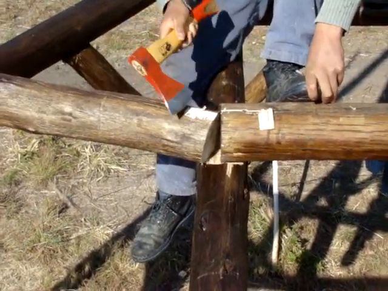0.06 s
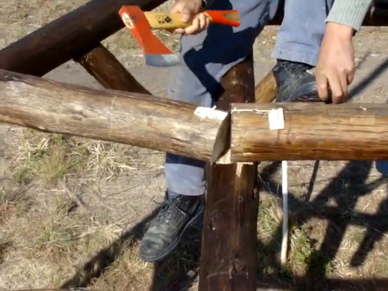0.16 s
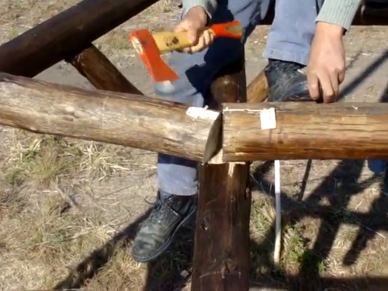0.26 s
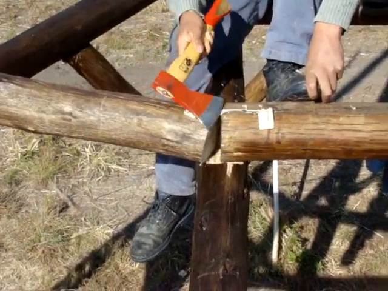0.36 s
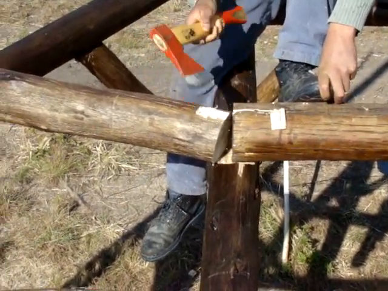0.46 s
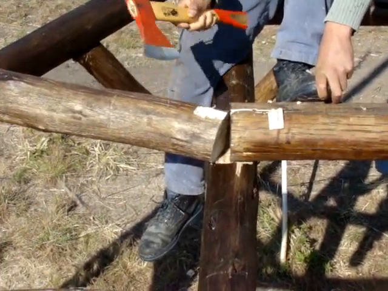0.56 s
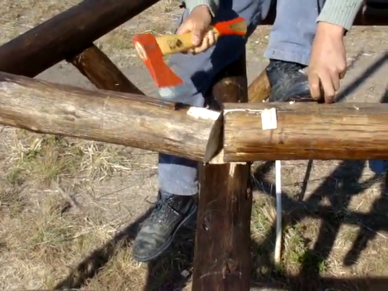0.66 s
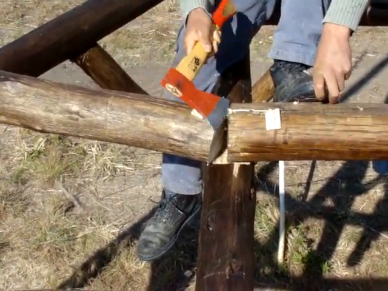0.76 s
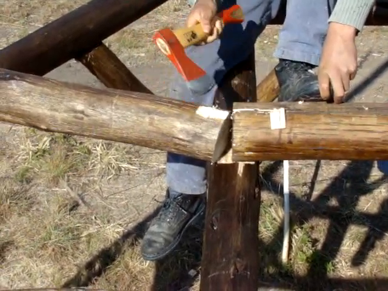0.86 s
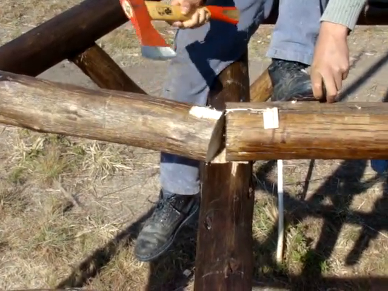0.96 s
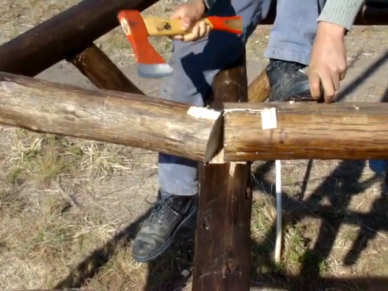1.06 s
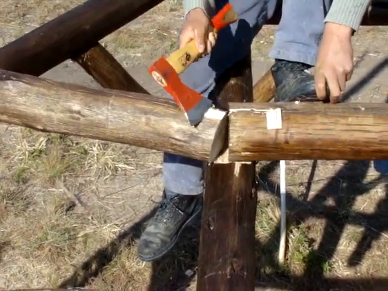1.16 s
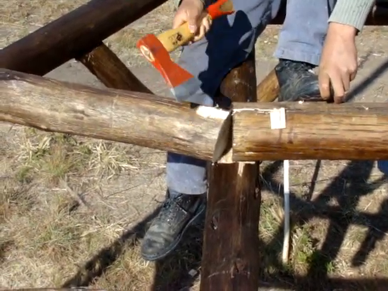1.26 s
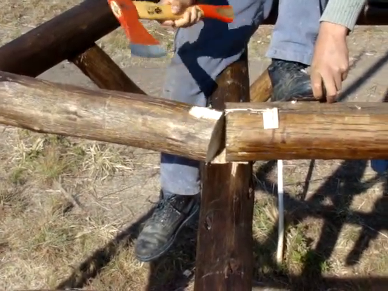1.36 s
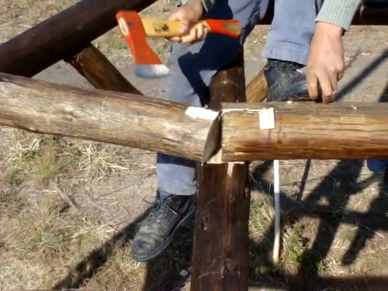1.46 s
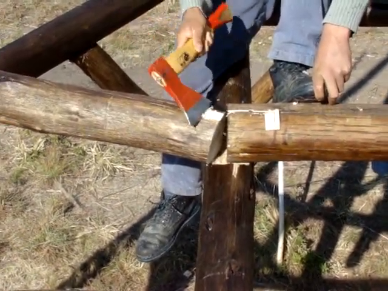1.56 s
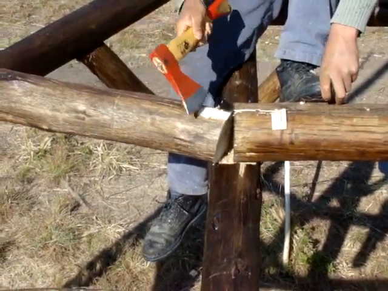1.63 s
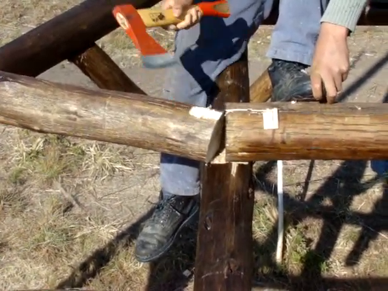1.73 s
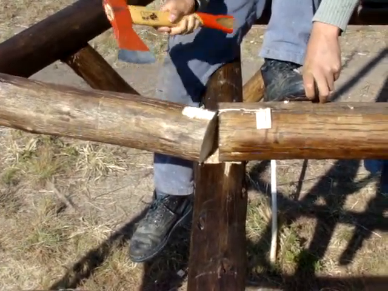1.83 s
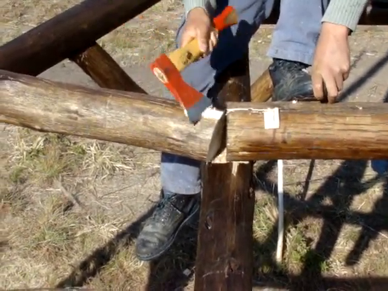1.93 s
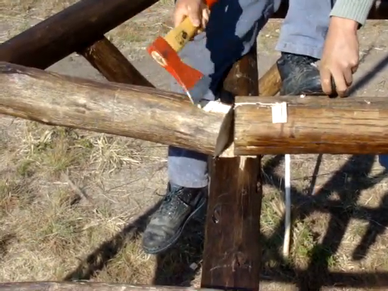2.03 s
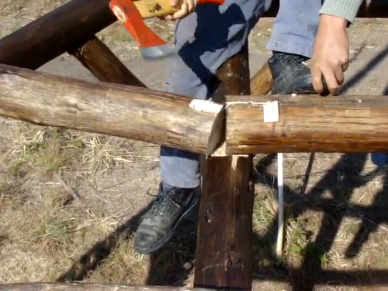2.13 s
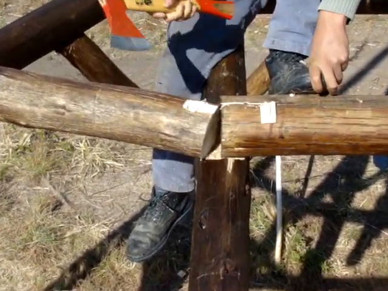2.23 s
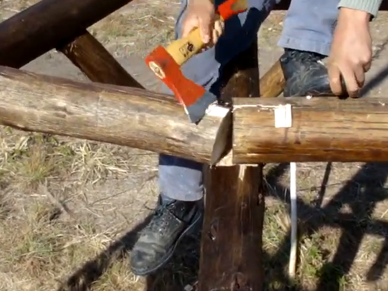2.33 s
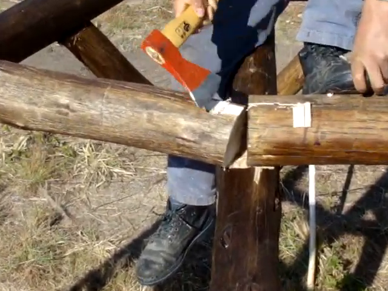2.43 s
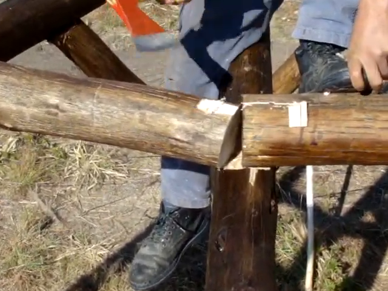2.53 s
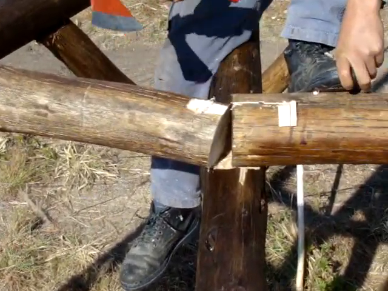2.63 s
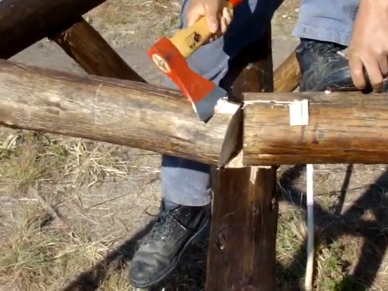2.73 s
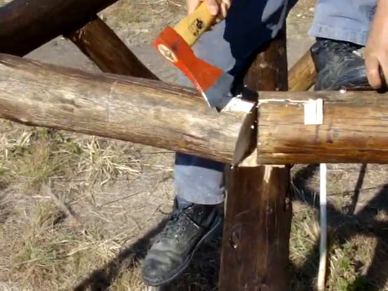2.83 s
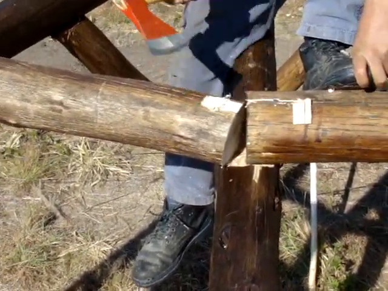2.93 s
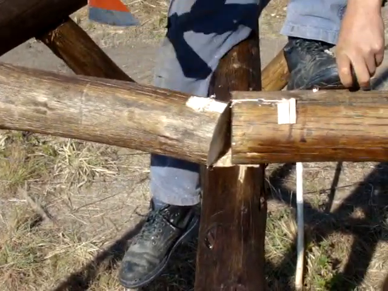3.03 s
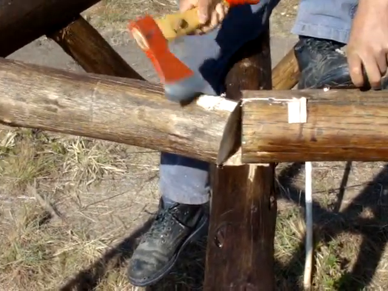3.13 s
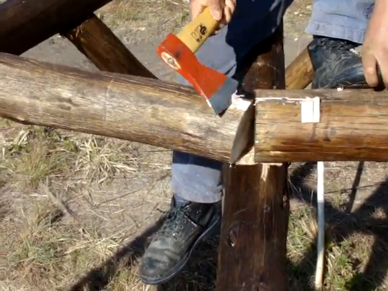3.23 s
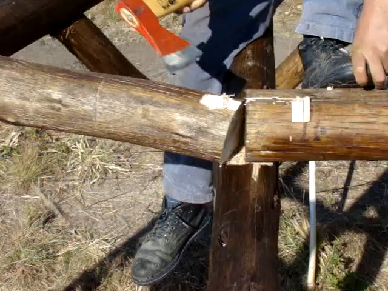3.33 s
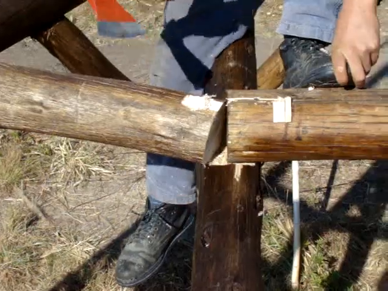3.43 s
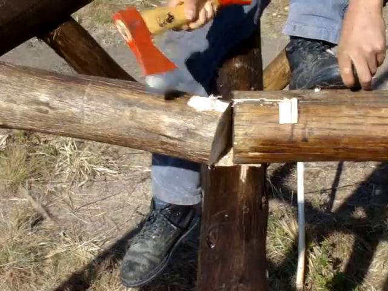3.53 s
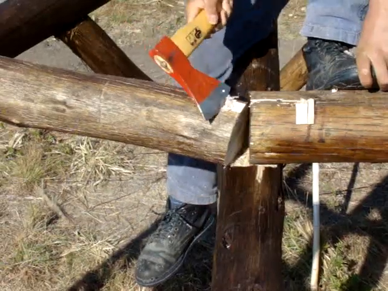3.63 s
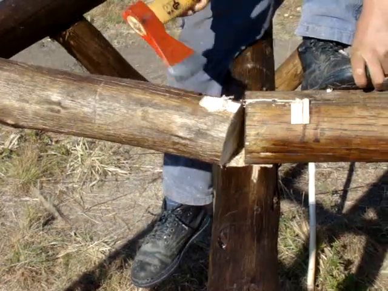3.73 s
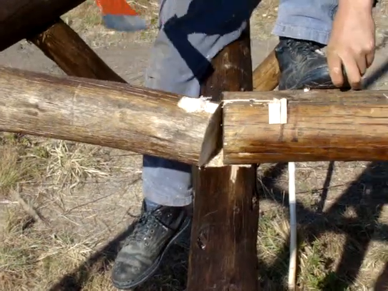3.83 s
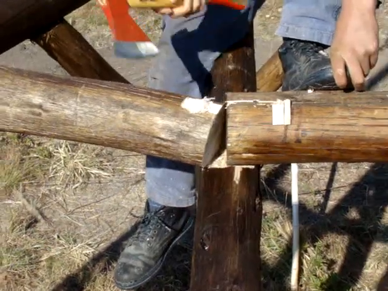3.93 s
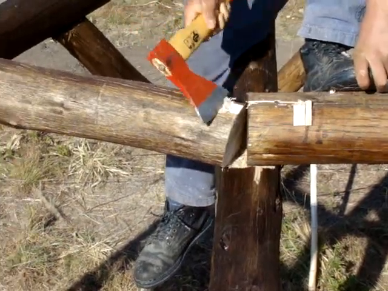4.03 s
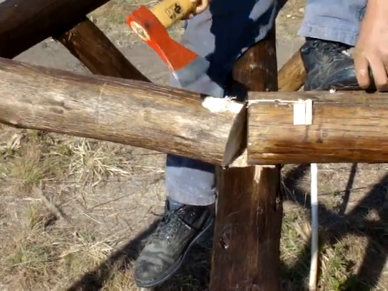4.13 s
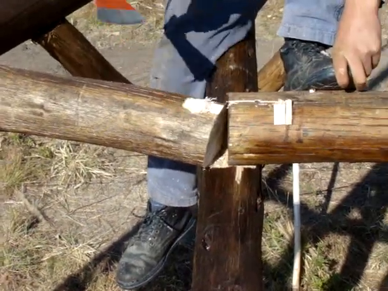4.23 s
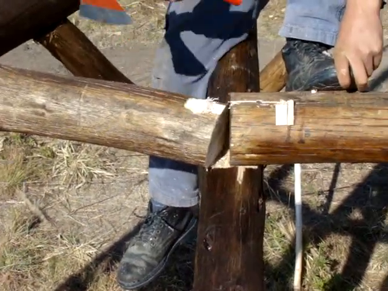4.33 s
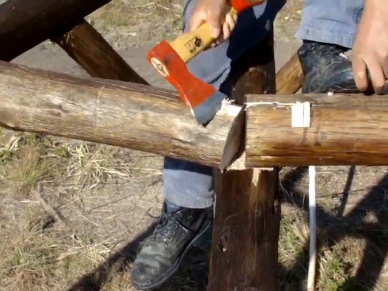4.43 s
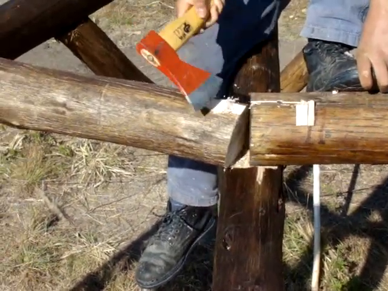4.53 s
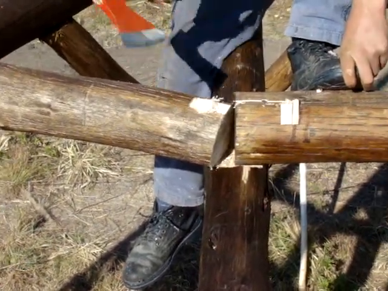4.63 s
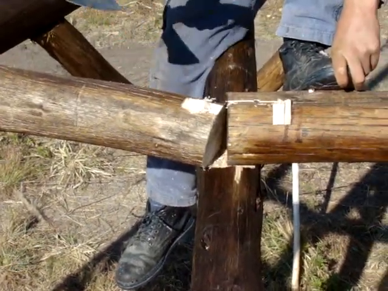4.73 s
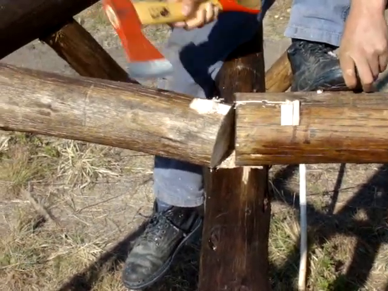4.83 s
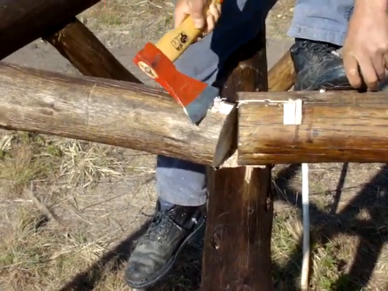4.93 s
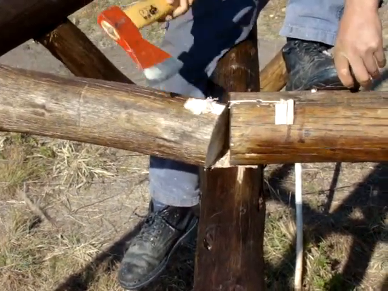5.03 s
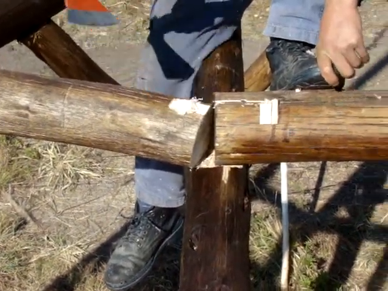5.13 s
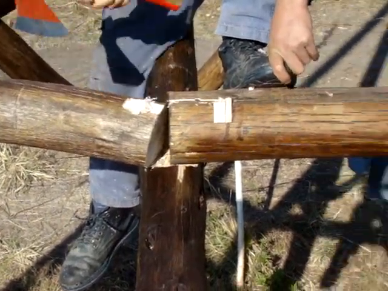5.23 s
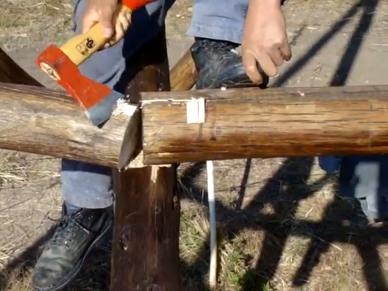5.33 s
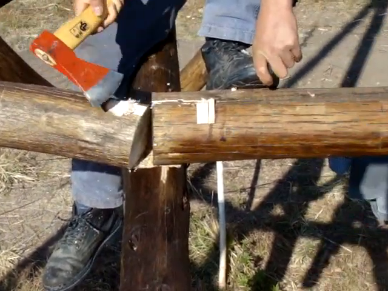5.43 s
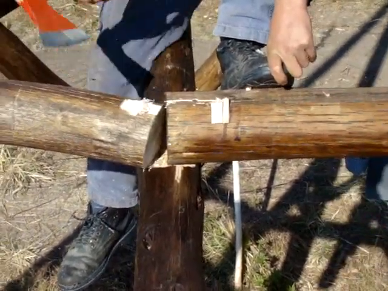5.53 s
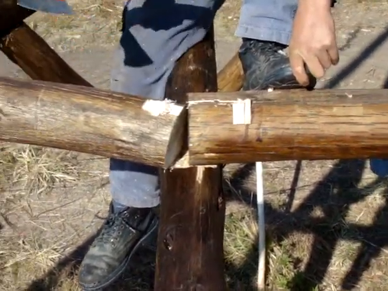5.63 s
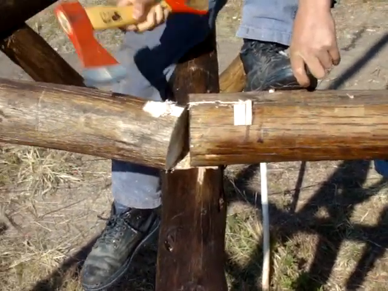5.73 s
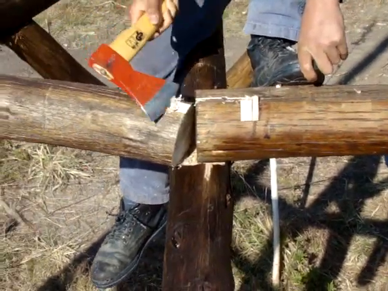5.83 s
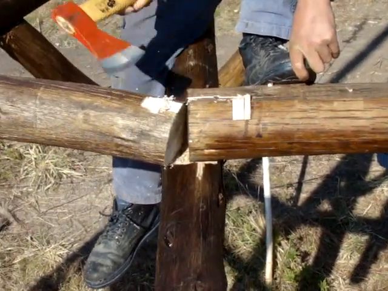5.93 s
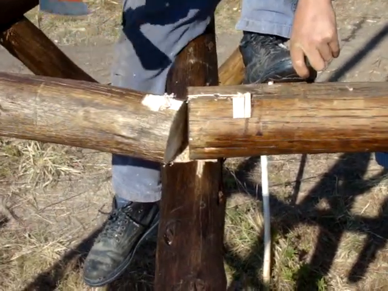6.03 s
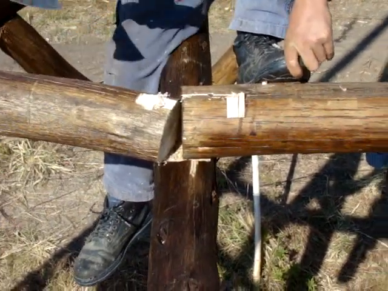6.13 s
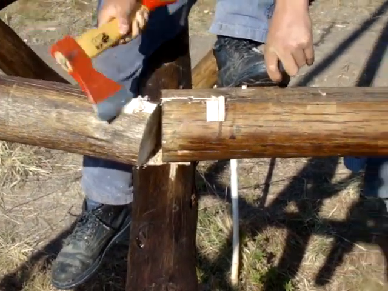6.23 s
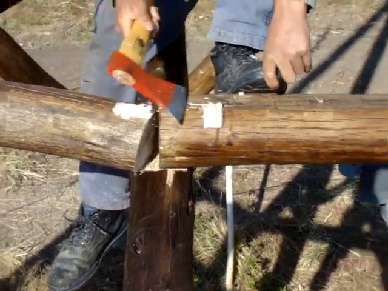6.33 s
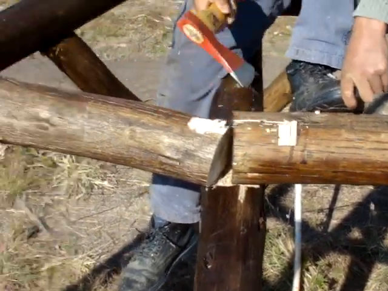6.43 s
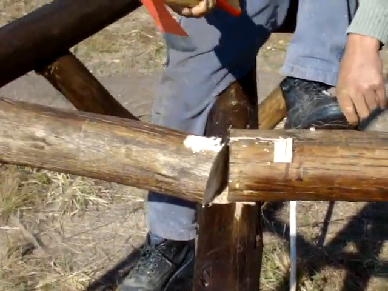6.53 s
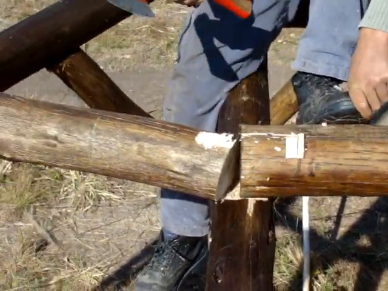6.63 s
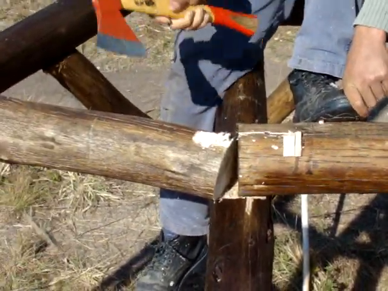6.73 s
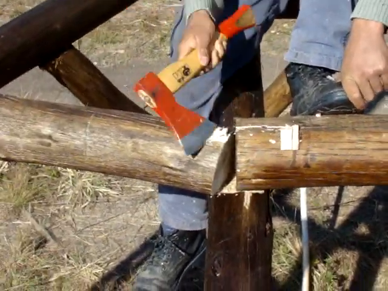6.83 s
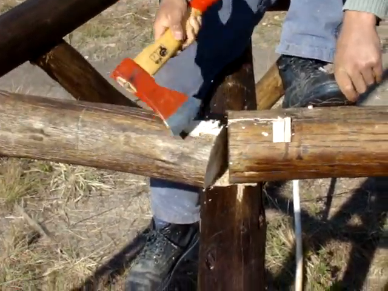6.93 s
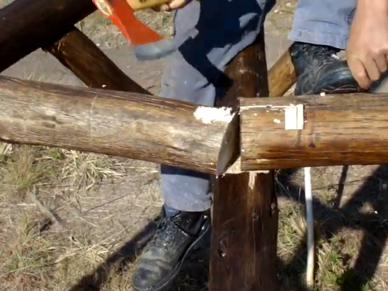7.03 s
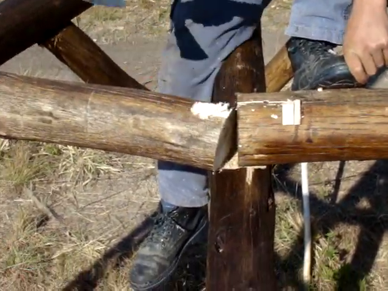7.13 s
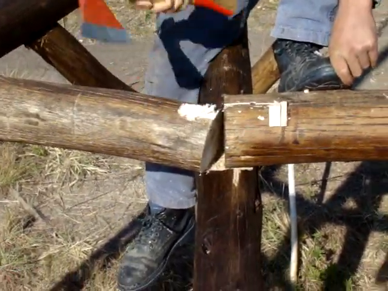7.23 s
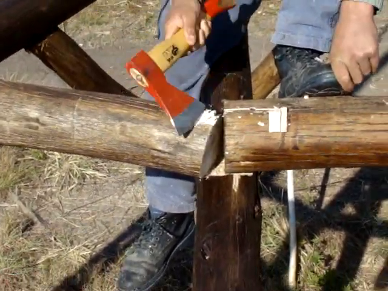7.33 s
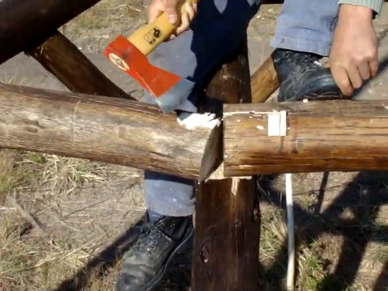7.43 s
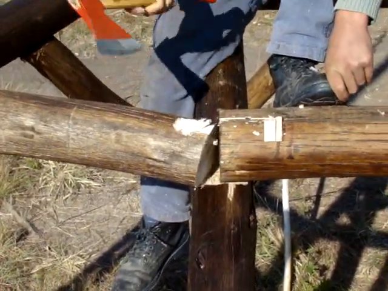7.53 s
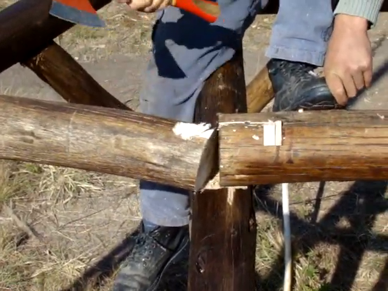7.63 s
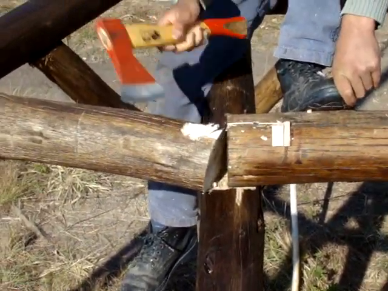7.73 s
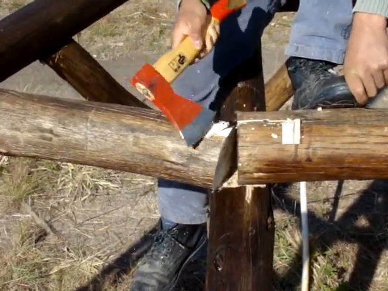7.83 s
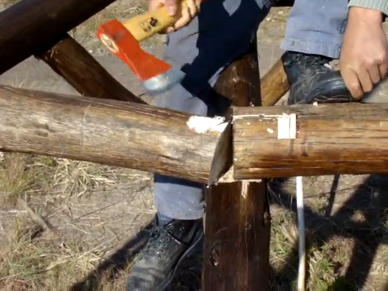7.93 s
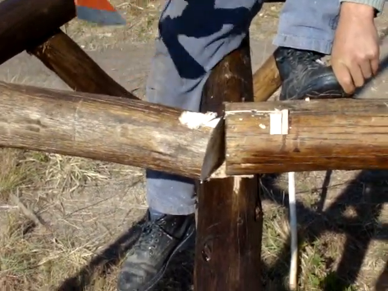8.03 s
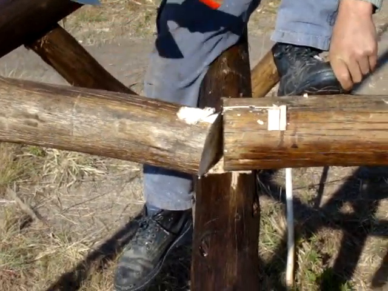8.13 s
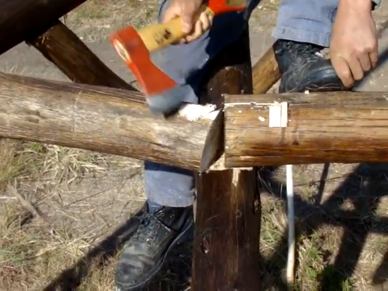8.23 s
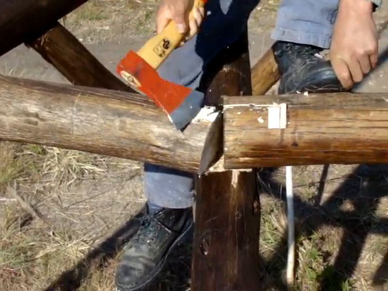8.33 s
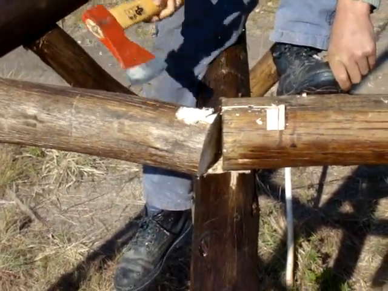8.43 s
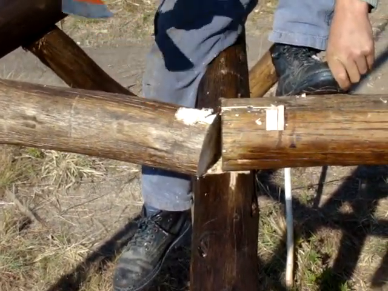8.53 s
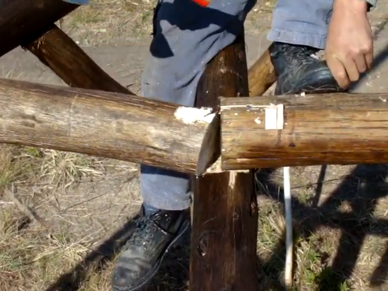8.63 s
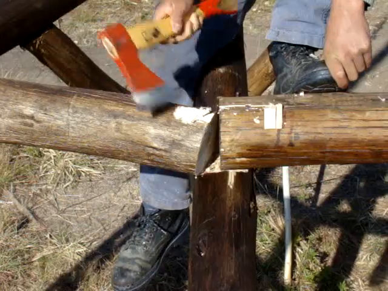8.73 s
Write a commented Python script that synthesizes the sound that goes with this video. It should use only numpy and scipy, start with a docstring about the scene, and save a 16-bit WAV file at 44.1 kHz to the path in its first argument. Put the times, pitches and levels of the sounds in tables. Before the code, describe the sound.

Quick, regular hatchet blows crack into a dry log, close up, over low wind gusts, plasticky handling ticks and faint distant sparrow chirps.

```python
"""A hatchet trims the end of a round pole in a log frame outdoors, some twenty light blows.
Struck wood and the steel head ring as sums of decaying modes; crack, splinters and thud are shaped noise.
Fingers tick and rustle on the plastic case of a small microphone by noise exciting its modes.
Gusts are lumpy low noise with short falling swings; sparrows chirp far off as gliding sines.
A faint squeak is three harmonics; still air is a bed of coloured noise."""
import sys
import numpy as np
from scipy import signal
from scipy.fft import rfft, irfft
from scipy.io import wavfile
from scipy.ndimage import uniform_filter1d

SR = 44100
rng = np.random.default_rng(int(sys.argv[2]) if len(sys.argv) > 2 else 0)


def digitize_waveform(pressure):
    """Quantize a signal to 16-bit integers and store it at the path in sys.argv[1].

    Rows of a 2-D input are taken as channels; values are limited to [-1, 1].
    """
    field = np.atleast_2d(pressure).T
    bounded = np.clip(field, -1, 1)
    quanta = np.round(bounded * 32767).astype(np.int16)
    wavfile.write(sys.argv[1], SR, quanta)


N = 386316  # length in samples


def amp(db):
    """Decibel law: the amplitude gain of a level in dB."""
    return 10 ** (np.asarray(db) / 20)


def evened(x):
    """Power normalisation: scales a signal to rms 1."""
    return x / np.sqrt(np.mean(x ** 2) + 1e-20)


def peaked(x):
    """Peak normalisation: scales a signal to a highest magnitude of 1."""
    return x / np.abs(x).max()


def read(points, hz):
    """Spectral interpolation: reads a table on a log-frequency axis."""
    f, value = np.transpose(points)
    return np.interp(np.log(hz + 1), np.log(f + 1), value)


def add(mix, s, sound):
    """Superposition: adds a sound to the mix at a time in seconds."""
    part = mix[round(s * SR):][:len(sound)]
    part += sound[:len(part)]


def coloured(x, points):
    """Linear filtering: weights the spectrum by a table of levels in dB."""
    gain = amp(read(points, np.fft.rfftfreq(len(x), 1 / SR)))
    return irfft(rfft(x) * gain, len(x))


def decaying(noise, t60_points):
    """Frequency-dependent damping: each band of the noise dies at its own rate."""
    hz, t, z = signal.stft(noise, SR, nperseg=256)
    t60 = read(t60_points, hz)[:, None]
    return signal.istft(z * amp(-60 * t / t60), SR, nperseg=256)[1]


def ringing(hz, db, t60, t, turn=-1):
    """Modal superposition: dying sines; with turn -1 neighbouring modes start in opposite directions."""
    sign = turn ** np.arange(len(hz))[:, None]
    hz, db, t60 = (np.reshape(v, (-1, 1)) for v in (hz, db, t60))
    envelope = amp(db - 60 * t / np.maximum(t60, .004))
    return (sign * envelope * np.sin(2 * np.pi * hz * t)).sum(0)


# bending modes of pole and frame before each blow's detuning: pitch_hz
POLE_PITCHES = [240, 321, 433, 462, 501, 530, 580, 606, 695, 743, 800, 880, 931, 995, 1045, 1160, 1332,
                1465, 1615, 1828, 1979, 2126, 2290, 2515, 2820, 3000, 3170]
# the same modes in the same order, before each blow's tilt and spread: level_db, decay_t60_s
POLE_MODES = [(-14.5, 0.27), (-14, 0.29), (-11, 0.24), (-0.5, 0.12), (0.5, 0.15), (-0.5, 0.15), (-4, 0.19),
              (-7, 0.12), (-10, 0.12), (-0.5, 0.11), (3, 0.015), (7.5, 0.032), (9.5, 0.079), (-30, 0.047),
              (-6, 0.15), (-6.5, 0.057), (-5.5, 0.094), (6, 0.091), (-36.5, 0.062), (-16, 0.025),
              (3.5, 0.087), (10, 0.03), (-1, 0.11), (2.5, 0.068), (17, 0.019), (-22.5, 0.065),
              (16.5, 0.027)]
REBOUND_S, REBOUND_SHARE, REBOUND_PUSH_S = .014, 0.89, .0003  # the pole lands again in its joint


def pole(low_db, high_db, grit, spot_db, detune):
    """Impulse excitation of bending modes: the bite, then the landing, sets pole and frame ringing."""
    t = np.arange(SR // 2) / SR
    short = t[:4096]
    hz, (mode_db, t60) = np.array(POLE_PITCHES), np.transpose(POLE_MODES)
    tilt_db = np.interp(np.log(hz), np.log([450, 800, 1300]), [low_db, 0, high_db])
    contact = np.exp(-((short - .001) / 0.00014) ** 2)
    tearing_fibres = 0.027 * grit * np.exp(-short / 0.0041)
    # wood on wood is a slower push than the bite
    landing_s = REBOUND_S * (1 + 0.079 * detune[-1])
    landing = REBOUND_SHARE * np.exp(-((short - landing_s) / REBOUND_PUSH_S) ** 2)
    modes = ringing(hz * (1 + 0.0061 * detune), mode_db + tilt_db + 2.4 * spot_db, t60, t)
    return peaked(signal.fftconvolve(contact + tearing_fibres + landing, modes))


def first_knock(detune):
    """Heavily damped oscillation: the first wave through the cut end dies within a few swings."""
    t = np.arange(4096) / SR
    wave = t / 0.0016
    hz = 800 * (1 + 0.047 * detune)
    return wave ** 2 * np.exp(2 - 2 * wave) * np.sin(2 * np.pi * hz * t)


# spectrum of the cracking wood: band_hz, density_db (dB per Hz)
CRACK_SPECTRUM = [(880, -6.5), (1500, -6), (4020, -27.5), (4760, -10), (5540, -31.5), (8150, -19),
                  (10200, -33.5), (13300, -70), (22000, -120)]


def crack(hiss):
    """Broadband fracture noise: coloured noise with a short rise and exponential decay."""
    t = np.arange(4096) / SR
    return evened(coloured(hiss, CRACK_SPECTRUM)) * np.exp(-t / 0.0036) * np.minimum(t / 0.0015, 1)


def splinters(snaps, chatter):
    """Amplitude-modulated noise: splinters part in uneven bursts."""
    bursts = amp(5.6 * evened(uniform_filter1d(chatter, size=80)))
    spectrum = [(700, -19), (1500, -7.5), (3200, -8), (5000, -15.5), (10000, -29.0)]  # Hz, dB
    return evened(coloured(snaps * bursts, spectrum)) * np.exp(-np.arange(4096) / SR / 0.0084)


# modes of the steel head, before a further one-second fade: pitch_hz, decay_t60_s
STEEL_MODES = [(4498, 1.6), (4504.5, 1.6), (6308, .25), (8091, .45), (8400, .3), (9770, .2)]
# each steel mode relative to the steel level of its blow: level_db
STEEL_LEVELS = [4.5, -16, -8, -3.5, -12, -12.5]
PING_DB, PING_S = 9.5, 0.056  # the ring starts louder and sinks while the edge sits in the wood
SWING_DB, SWING_S = 3, .09  # the ring wavers as the head turns in the air: spread and spacing


def steel_head(lowest_db, higher_db):
    """Lightly damped modes: the head rings on, and its close lowest pair beats."""
    t = np.arange(SR) / SR
    hz, t60 = np.transpose(STEEL_MODES)
    mode_db = np.where(hz < 5000, lowest_db, higher_db) + STEEL_LEVELS
    ring = ringing(hz, mode_db, t60, t, turn=1) * (1 - t)
    ping_db = PING_DB * np.exp(-t / PING_S)
    swing_db = SWING_DB * np.interp(t, np.arange(40) * SWING_S, rng.standard_normal(40))
    return ring * amp(ping_db + swing_db)


# spectrum of frame and ground: band_hz, density_db (dB per Hz)
THUD_SPECTRUM = [(45, -53), (90, -29), (170, -9.5), (300, -2.5), (500, 2), (800, -5.5), (1500, -15),
                 (3000, -63.5)]
# its damping: band_hz, decay_t60_s
THUD_DECAY = [(150, 0.6), (400, 0.21), (1000, 0.22), (3000, 0.033)]


def thud():
    """Frequency-dependent damping: the loose frame shudders as noise whose treble dies first."""
    x = coloured(decaying(rng.standard_normal(SR // 2), THUD_DECAY), THUD_SPECTRUM)
    rise = np.minimum(np.arange(len(x)) / SR / 0.015, 1)
    return peaked(x * rise * np.linspace(1, 0, len(x)))


KNOCK_DB, THUD_DB = 5, -5  # relative to the ring of the pole
KNOCK_DELAY_S = 0.001593


def blow(db, low_db, high_db, crack_db, splinters_db, steel_db, upper_db):
    """Impact superposition: the edge bites, the pole jumps and lands in its joint, the head rings."""
    grit, hiss, snaps, chatter = rng.standard_normal((4, 4096))
    # each spot on the pole favours other modes
    spot_db, detune = rng.standard_normal((2, len(POLE_PITCHES)))
    out = steel_head(steel_db, upper_db)
    add(out, 0, pole(low_db, high_db, grit, spot_db, detune))
    add(out, KNOCK_DELAY_S, amp(KNOCK_DB) * first_knock(detune[0]))
    add(out, 0, amp(THUD_DB) * thud())
    add(out, 0, amp(crack_db) * crack(hiss) + amp(splinters_db) * splinters(snaps, chatter))
    return amp(db) * out


# modes of the plastic case: pitch_hz, level_db, decay_t60_s
CASE_MODES = [(1440, 4, 0.015), (1620, -5, 0.029), (2286, -2.5, 0.0077), (3470, -19.5, 0.023)]
SCRAPE_S = 0.0032  # decay time constant


def tick(db, treble_db):
    """Noise-excited resonance: a short scrape rings the case; its edge is a bright snap."""
    t = np.arange(3000) / SR
    scrape = rng.standard_normal((2, len(t))) * np.exp(-t / SCRAPE_S) * np.minimum(t / 0.0019, 1)
    body = signal.fftconvolve(scrape[0], ringing(*np.transpose(CASE_MODES), t))[:len(t)]
    rasp = coloured(scrape[0], [(400, -38), (1000, 1), (2000, 1.5), (4000, -36)])
    snap = coloured(scrape[1], [(1500, -26.0), (3000, -5.5), (6000, -2), (10000, -9.0)])
    snap = snap * np.exp(-t / 0.0095)
    return amp(db) * (peaked(body) + 0.22 * peaked(rasp) + amp(treble_db) * peaked(snap))


# blows; levels after the first are relative to it:
# start_s, level_db, low_modes_db, high_modes_db, crack_db, splinters_db, lowest_steel_db, higher_steel_db
HATCHET_BLOWS = [(0.093, -4, 2, 2.5, -2.5, -31, -69, -64), (0.435, -9, 12, 1, -2.5, -9, -46, -60),
                 (0.456, -16, 5, 6, 6.5, -4.5, -37.5, -44), (0.832, -14, 11, -22, 6.5, -4.5, -40, -26),
                 (1.258, -6.5, 4, 1.5, 1.5, -19, -56, -55), (1.65, -4.5, 1.5, 0.5, -5.5, -19, -57, -63),
                 (2.045, -3.5, 7, 4.5, -0.5, -18, -51, -68), (2.453, -3.5, 5, -8, -5.5, -12.5, -61, -56),
                 (2.867, -6, 4.5, 1.5, 4, -16.5, -65, -53), (3.286, -6.5, -5.5, 0, 0, -15, -53, -43.5),
                 (3.696, -8, -1.5, -0.6, -0.5, -11.5, -62, -58), (4.124, -4.5, -7, -2, -7, -28, -62, -64),
                 (4.558, -3, -12.5, 0, -3, -22, -57, -47), (5.004, -4.5, 1.5, -14, 2.2, -14, -55, -44),
                 (5.446, -4.5, 1.5, 1.5, 3, -13.5, -40.5, -33.5),
                 (5.902, -4, 7.5, 1.5, -3.5, -16.5, -61, -44), (6.37, -7.5, -1, -3, 2.5, -8, -28.5, -31),
                 (6.414, -14, -9, -29, -40, -12.5, -69, -58),
                 (6.434, -10.5, -13, -36, -14, -15.5, -37, -50), (6.953, -7, 1.5, -14, 1, -7, -42, -38.5),
                 (7.439, -8, 9, 6, 2.5, -39, -52, -39), (7.906, -4.5, -3.5, -4, -1.2, -15, -53, -31),
                 (8.387, -8.5, -3, -2.5, 8, -4.5, -53, -37)]
TOUCH_S, TOUCH_DB = 0.0018, -16.5  # lead before the blow, level relative to it


def chopping():
    """Event sequence: each blow follows a small tick as the edge grazes the bark."""
    chops = np.zeros(N)
    for s, *row in HATCHET_BLOWS:
        start = s - .001  # the contact peaks 1 ms into the blow
        add(chops, start, blow(*row))
        add(chops, start - TOUCH_S, tick(row[0] + TOUCH_DB, -13.5))
    return chops


def yard(x):
    """Convolution with scattered reflections: random echoes off ground and timber, soon gone."""
    taps = np.zeros(SR // 2)
    at = np.arange(200, len(taps) - 20, 20) + rng.integers(0, 20, (len(taps) - 201) // 20)
    taps[at] = rng.choice([-1., 1.], len(at))
    t60_points = [(60, 0.095), (200, 0.73), (500, 0.058), (1500, 0.22), (4000, 0.18), (9000, 0.059)]  # Hz, s
    tail = decaying(taps, t60_points)
    return signal.fftconvolve(x, tail / np.linalg.norm(tail))[:N]


def by_chance(per_s, count=400):
    """Poisson process: random moments, each with two normal draws."""
    gaps = rng.exponential(1, (count, 1)) / per_s
    rows = np.hstack([np.cumsum(gaps, axis=0), rng.standard_normal((count, 2))])
    return rows[rows[:, 0] < N / SR]


def sequence(rows, sound):
    """Event sequence: plays one sound per table row at its start."""
    out = np.zeros(N)
    for s, *row in rows:
        add(out, s, sound(*row))
    return out


FAINT_TICKS_PER_S, FAINT_TICK_DB = 1.5, -38  # mean rate and mean level


def faint_tick(size, bright):
    """Random excitation: a weak tick of chance level and brightness."""
    return tick(FAINT_TICK_DB + 3 * size, -12 + 8 * bright)


# fingers slide on the case; envelope before body and snaps are summed: start_s, level_db
RUSTLE_ENVELOPE = [(5.18, -78), (5.22, -42.5), (5.3, -39), (5.345, -48), (5.37, -83)]


def rustle():
    """Stochastic excitation: dense tiny snaps, partly ringing the case."""
    s, db = np.transpose(RUSTLE_ENVELOPE)
    t = np.arange(s[0], s[-1], 1 / SR)
    heights = rng.standard_normal(len(t)) * amp(3.9 * rng.exponential(1, len(t)))
    snaps = heights * (rng.random(len(t)) < 2500 / SR)  # 2500 snaps a second on average
    body = signal.fftconvolve(snaps, ringing(*np.transpose(CASE_MODES), t[:2000] - t[0]))[:len(t)]
    bright = coloured(snaps, [(600, -26), (2500, -2), (10000, -18)])
    return amp(np.interp(t, s, db)) * (evened(body) + 0.76 * evened(bright))


# strength of the wind: start_s, level_db
GUST_LEVELS = [(0.0, -21), (0.34, -30), (0.54, -37.5), (0.9, -47), (1.08, -37.5), (1.27, -24), (1.49, -28),
               (1.8, -38.5), (2.46, -25), (2.72, -36), (2.82, -52.5), (3.05, -46), (3.2, -65.5),
               (5.25, -61.5), (5.38, -34), (5.56, -50), (5.76, -40), (6.03, -28), (6.27, -29.5),
               (6.54, -54), (6.8, -34), (6.95, -34), (7.56, -28.5), (7.76, -38), (7.95, -46.5), (8.42, -27),
               (8.76, -36.5)]
# spectrum of the wind before its reach is scaled: band_hz, density_db (dB per Hz)
WIND_SPECTRUM = [(15, -37.5), (25, -24.5), (76, -9), (189, -6), (284, -7.5), (447, -18.5), (560, -23.5),
                 (762, -34), (1200, -52), (1560, -77), (2640, -120)]
REACH = 0.9  # factor on the spectrum's frequencies, before the lumps vary it


def wind():
    """Turbulent pressure noise on the microphone: low noise in lumps; strong lumps reach higher."""
    frames, hz = N // 128 + 5, np.fft.rfftfreq(512, 1 / SR)[:, None]
    a, b = rng.standard_normal((frames, 257, 2)).T
    lumps = uniform_filter1d(uniform_filter1d(rng.standard_normal(frames), size=3), size=3)
    lumps = evened(lumps)
    reach = REACH * amp(2.2 * lumps)
    # only the change of spectrum here; the spectrum itself is applied finely below
    shift = amp(read(WIND_SPECTRUM, hz / reach) - read(WIND_SPECTRUM, hz))
    z = (a + 1j * b) * shift * amp(1.32 * lumps)
    noise = signal.istft(z, nperseg=512, noverlap=384)[1][:N]
    gust_db = np.interp(np.arange(N) / SR, *np.transpose(GUST_LEVELS))
    return evened(coloured(noise, WIND_SPECTRUM)) * amp(gust_db)


def buffet(db, hz, turns=1.2):
    """Vortex impact: an eddy slaps the membrane in a couple of swings, falling in pitch."""
    u = np.arange(2000) / SR * hz / turns
    phase = 2 * np.pi * (turns * u ** 0.957 + rng.random())
    return amp(db) * u ** 2 * np.exp(1 - u ** 2) * np.sin(phase)


# mean rate, mean level over the gust, median nominal pitch
SMALL_BUFFETS_PER_S, SMALL_BUFFET_DB, SMALL_BUFFET_HZ = 22, 6.5, 240


def small_buffets():
    """Poisson process: small slaps come by chance, their level following the gusts."""
    out = np.zeros(N)
    for s, size, pitch in by_chance(SMALL_BUFFETS_PER_S):
        gust_db = np.interp(s, *np.transpose(GUST_LEVELS))
        add(out, s, buffet(gust_db + SMALL_BUFFET_DB + 3 * size, SMALL_BUFFET_HZ * 1.4 ** pitch))
    return out


def chirp(length, start_hz, end_hz, db):
    """Frequency modulation: a gliding whistle whose level wavers with distance."""
    u = np.linspace(0, 1, round(length * SR))
    hz = start_hz * (end_hz / start_hz) ** u
    waver = 1 + 0.83 * evened(uniform_filter1d(rng.standard_normal(4096), size=150))[:len(u)]
    return amp(db) * np.sin(2 * np.pi * np.cumsum(hz) / SR) * np.sin(np.pi * u) * waver


# the squeak's unsounded fundamental and its level before the overtone weights: start_s, pitch_hz, level_db
SQUEAK_GLIDE = [(8.268, 343, -62), (8.29, 368, -44), (8.32, 404, -43), (8.35, 423, -45)]


def squeak():
    """Harmonic series: a faint rising squeak of harmonics two to four."""
    s, hz, db = np.transpose(SQUEAK_GLIDE)
    t = np.arange(s[0], s[-1], 1 / SR)
    phase = 2 * np.pi * np.cumsum(np.interp(t, s, hz)) / SR
    overtones = .9 * np.sin(2 * phase) + 1.1 * np.sin(3 * phase) + .6 * np.sin(4 * phase)
    return amp(np.interp(t, s, db)) * overtones


# spectrum of the still air, relative: band_hz, density_db (dB per Hz)
AIR_SPECTRUM = [(24, -41), (40, -39), (116, -43), (189, -43.5), (354, -17.5), (1050, -12.5), (1150, -17),
                (1330, -3.5), (1830, -16.5), (2260, -17.5), (3430, -22.5), (4130, -23.5), (7370, -26),
                (10200, -28.5), (13300, -62), (22000, -120)]
AIR_DB = -49.5  # rms level


def air():
    """Coloured stationary noise: hiss and far rustle, with drifting patches in time and frequency."""
    frames, hz = N // 256 + 5, np.fft.rfftfreq(1024, 1 / SR)
    a, b, patches = rng.standard_normal((frames, 513, 3)).T
    patches = evened(uniform_filter1d(uniform_filter1d(patches, size=10, axis=0), size=6, axis=1))
    z = (a + 1j * b) * amp(read(AIR_SPECTRUM, hz)[:, None] + 1.4 * patches)
    return evened(signal.istft(z, nperseg=1024, noverlap=768)[1][:N]) * amp(AIR_DB)


# finger ticks on the case and small chips: start_s, body_level_db, treble_db (relative to the body)
CASE_TICKS = [(0.192, -36, 0), (0.882, -28.5, -2), (1.986, -26.5, 7), (2.094, -14.5, -5.5), (2.278, -31, 9),
              (2.346, -36.5, 12.5), (2.414, -25.5, -4), (2.5228, -19, 2.5), (3.389, -46, 11),
              (5.103, -27, 8.5), (5.1473, -16, 8.5), (5.1621, -14.5, -33), (5.17, -16, -6),
              (5.252, -25, -6), (5.273, -28.5, -18), (5.299, -23, -7), (5.331, -24.5, -2),
              (5.351, -11.5, -11.5), (5.3916, -15, -16), (5.4048, -14.5, -17), (5.567, -27, -5),
              (5.613, -24, -27), (5.6217, -10.5, -6), (5.658, -23, -12), (5.784, -28.5, -0.5),
              (6.265, -22.5, -28), (6.2713, -10, -14.5), (6.3158, -13.5, -6.5), (6.352, -25, -35),
              (6.5308, -13.5, -38), (6.623, -34, -1), (6.6635, -20.5, -31), (8.238, -29.5, -23),
              (8.63, -31.5, -11)]
# sparrow notes, level before the waver: start_s, length_s, start_pitch_hz, end_pitch_hz, level_db
SPARROW_NOTES = [(0.36, .03, 3500, 3300, -56), (1.038, 0.051, 4660, 3320, -51),
                 (1.451, 0.06, 3290, 3280, -50), (1.595, 0.023, 2900, 3400, -54),
                 (1.75, 0.043, 5600, 3600, -43), (1.76, 0.03, 2800, 3500, -58),
                 (1.784, .025, 5330, 3940, -53), (1.79, 0.045, 2500, 2380, -59),
                 (1.936, .03, 2800, 3500, -51), (2.161, 0.033, 5150, 5200, -43),
                 (2.903, 0.047, 6350, 3440, -41), (3.025, 0.021, 2940, 3030, -44),
                 (3.13, 0.026, 2970, 2900, -47), (3.769, 0.02, 3630, 4540, -49),
                 (4.172, 0.063, 6270, 3800, -46), (5.169, 0.012, 4330, 3540, -31.5),
                 (7.197, 0.039, 5830, 3500, -47.5), (8.546, 0.06, 4900, 3800, -48.5),
                 (8.703, 0.047, 6330, 3820, -45.5)]
# the hardest single buffets: start_s, level_db, pitch_hz (nominal)
HARD_BUFFETS = [(0.189, -8, 260), (0.27, -6.5, 258), (0.319, -15.5, 224), (1.101, -12, 420),
                (1.122, -17.5, 323), (1.169, -16.5, 178), (1.189, -11.5, 266), (1.212, -9, 193),
                (1.288, -13, 171), (1.399, -14.5, 208), (1.429, -17, 300), (1.561, -14, 189),
                (1.83, -19.5, 219), (2.297, -18, 176), (2.326, -12.5, 176), (2.544, -18, 171),
                (2.572, -13, 181), (2.63, -18.5, 214), (2.733, -22, 312), (5.421, -19, 143),
                (5.833, -17.5, 192), (6.742, -24, 209), (6.814, -17, 158), (7.086, -16, 185),
                (7.301, -19, 280), (7.69, -14.5, 183), (8.225, -19, 169), (8.343, -15.5, 257),
                (8.519, -18.5, 252)]


def scene():
    """Superposition: blows with their echoes, case noises, birds, wind, squeak and air."""
    chops = chopping()
    small = sequence(CASE_TICKS, tick)
    small += sequence(SPARROW_NOTES, chirp)
    small += sequence(HARD_BUFFETS, buffet)
    add(small, RUSTLE_ENVELOPE[0][0], rustle())
    add(small, SQUEAK_GLIDE[0][0], squeak())
    steady = amp(-22) * yard(chops) + wind() + air()
    small += small_buffets()
    small += sequence(by_chance(FAINT_TICKS_PER_S), faint_tick)
    return (chops + small + steady)[None]


CEILING = .74  # amplitude the overload approaches, before the filters
EDGE_HZ = 10150  # upper band limit


def record(dry, gain_db=-3.5):
    """Saturation and band limiting: the highest peaks overload, then bass and top are cut."""
    drive = amp(gain_db) * dry / CEILING
    squeezed = CEILING * drive / (1 + drive ** 4) ** .25
    lean = signal.sosfilt(signal.butter(2, 75, "high", fs=SR, output="sos"), squeezed)
    low_pass = signal.firwin(511, EDGE_HZ, window=("kaiser", 9), fs=SR)
    return signal.oaconvolve(lean, low_pass[None], "same")


dry = scene()
out = record(dry)
digitize_waveform(out)
```